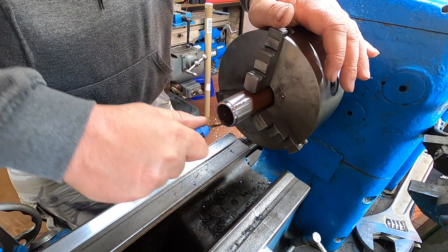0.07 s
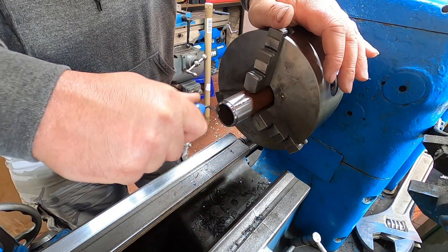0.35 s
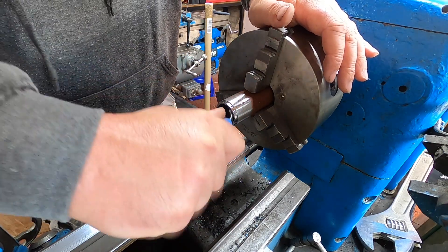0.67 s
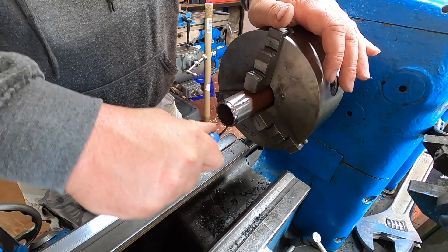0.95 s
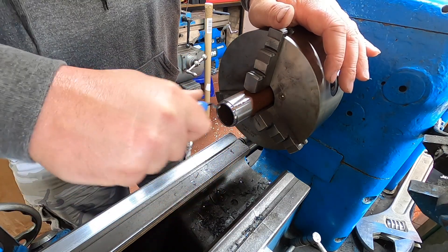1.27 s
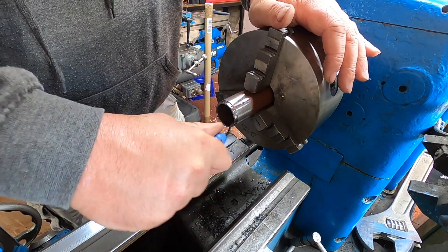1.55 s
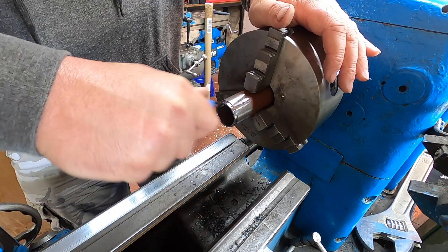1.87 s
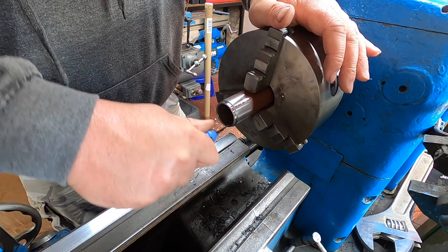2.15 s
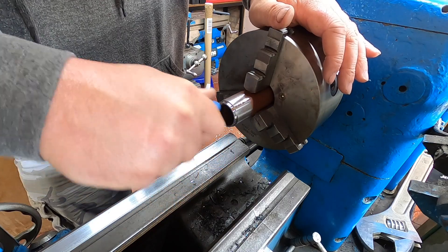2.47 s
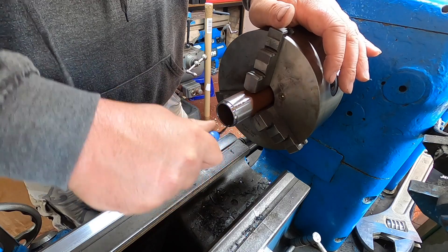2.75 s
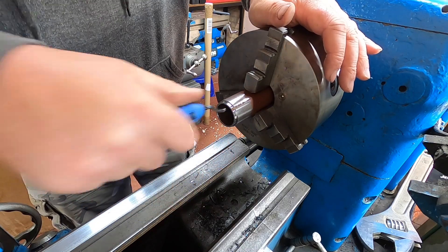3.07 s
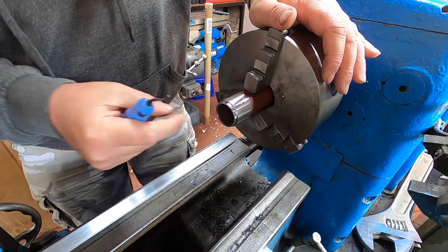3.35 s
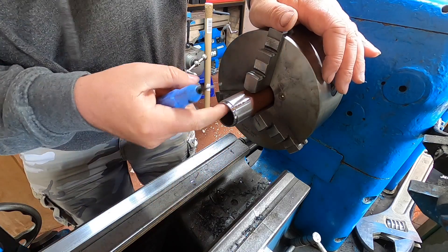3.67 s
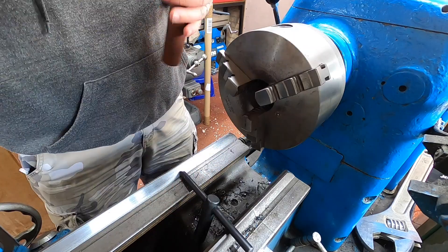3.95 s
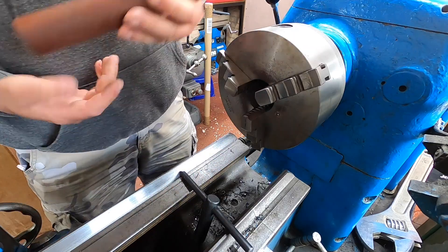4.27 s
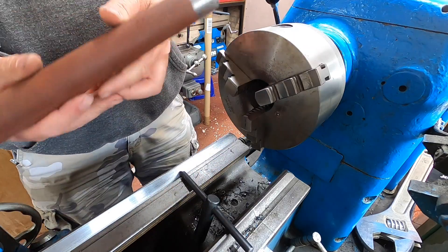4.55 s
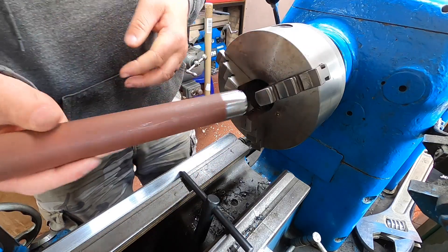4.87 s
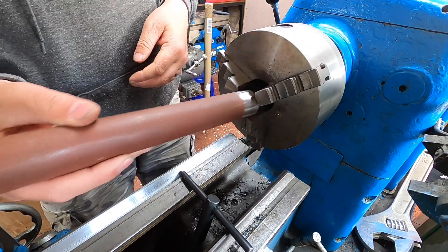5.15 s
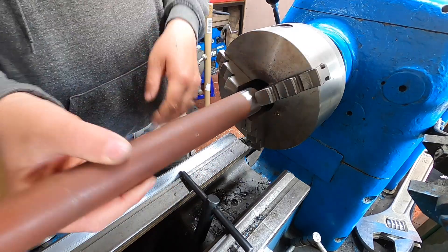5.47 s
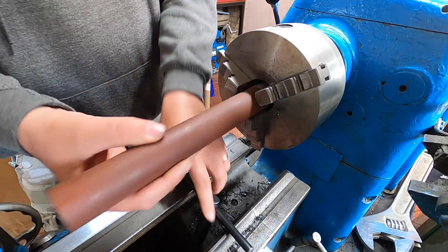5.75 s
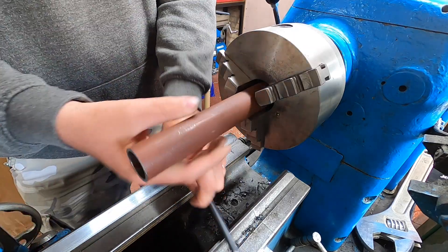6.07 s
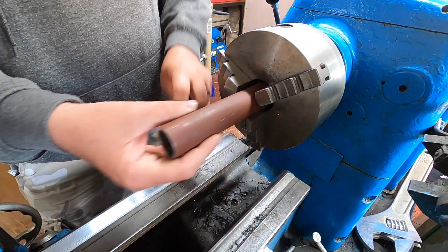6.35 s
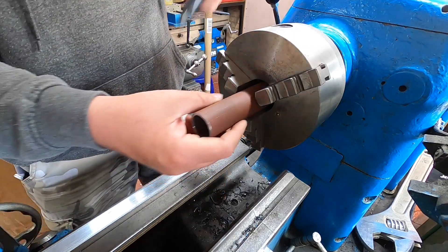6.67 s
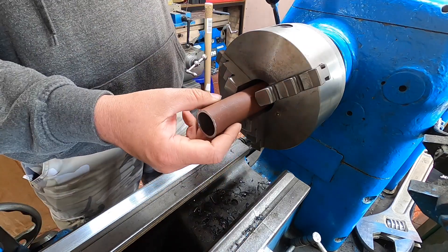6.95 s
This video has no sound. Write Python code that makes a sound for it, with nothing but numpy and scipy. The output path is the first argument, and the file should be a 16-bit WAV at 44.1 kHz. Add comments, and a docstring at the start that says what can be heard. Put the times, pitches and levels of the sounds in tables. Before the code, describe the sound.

Close, gritty scraping of a small blade on a steel tube starts lightly and builds, full of metallic snaps and short squeaks. The sound cuts out for a moment. Then a longer tube clinks and grinds into the jaws of a lathe chuck with quickly choked rings, followed by a quick cluster of clanks from a chuck key and a few light taps. A low rumble and faint cloth rustle fill the small workshop.

```python
"""Small workshop, at a lathe. A swivel-blade deburring tool is cranked round the mouth of a steel tube in the
chuck: stick-slip makes it rasp and squeak, and it snaps over burrs, skips and lands again. The sound drops out
and the scene changes: a longer tube is fed in. It knocks and slides on the jaws, ringing until the next contact
chokes it. The chuck key clanks as it is lifted off the bed. Sleeves swish over a low rumble."""
import sys
import numpy as np
from scipy import signal
from scipy.fft import rfft, irfft, next_fast_len
from scipy.io import wavfile
from scipy.ndimage import map_coordinates

SR = 44100
rng = np.random.default_rng(int(sys.argv[2]) if len(sys.argv) > 2 else 0)


def transcribe(signal):
    """Save signal, clipped to [-1, 1], as a 16-bit WAV file at the path in sys.argv[1]."""
    frames = np.atleast_2d(signal).T
    limited = np.clip(frames, -1, 1)
    pcm = np.round(limited * 32767).astype(np.int16)
    wavfile.write(sys.argv[1], SR, pcm)


N = 317961
TIME_S = np.arange(N) / SR

# All table levels are relative.
# Cutting effort. Each row: time in seconds, scrape level in dB.
SCRAPE_LEVEL = [(0.0, -54), (0.31, -55), (0.43, -47), (0.53, -38), (0.65, -42.5), (0.81, -50.5),
                (0.97, -53.5), (1.07, -49.5), (1.11, -44), (1.22, -40), (1.32, -38), (1.42, -32.5),
                (1.47, -39.5), (1.56, -43.5), (1.69, -43), (1.715, -30.5), (1.78, -34), (1.82, -30),
                (1.9, -36), (1.98, -27.5), (2.04, -30.5), (2.1, -44.5), (2.15, -26.5), (2.18, -36),
                (2.25, -37.5), (2.31, -28), (2.425, -37), (2.5, -30), (2.585, -31.5), (2.606, -35),
                (2.73, -36.5), (2.81, -33.5), (2.87, -36.5), (2.96, -37), (3.08, -36), (3.14, -59),
                (3.2, -70), (3.4, -84)]
# Blade resonance, sinking as it bites in. Each row: time in seconds, centre in Hz.
BITE_CURVE = [(0.3, 2830), (0.5, 2910), (0.66, 1874), (0.8, 2900), (1.25, 2580), (1.44, 2100), (1.53, 3730),
              (1.72, 2500), (1.82, 3100), (1.93, 2690), (2.03, 1574), (2.08, 3920), (2.17, 2974),
              (2.42, 2220), (2.53, 2400), (2.6, 1450), (2.69, 3610), (2.81, 2000), (2.95, 2560),
              (3.03, 2200), (3.1, 3420)]
# Blade squeaks. Each row: start in seconds, length in seconds, pitch in Hz, level in dB.
BLADE_SQUEAKS = [(0.341, 0.014, 2690, -31.5), (0.451, 0.027, 3140, -26), (1.246, 0.015, 2730, -23),
                 (1.864, 0.016, 2190, -23), (2.406, 0.0078, 2250, -22.5), (2.435, 0.006, 2280, -26.5),
                 (2.456, 0.014, 2200, -31), (2.477, 0.0049, 2270, -20.5), (2.528, 0.0024, 5170, -21),
                 (3.018, 0.015, 2270, -27.5), (3.065, 0.023, 3410, -30.5), (3.107, 0.0061, 3120, -23.5)]
# Burrs letting go. Each row: start in seconds, peak in dB, centre in Hz, treble tilt in dB per octave.
BURR_SNAPS = [(0.173, -30.5, 4050, 6), (0.331, -19, 3017, -0.5), (0.373, -21, 2860, 2),
              (0.4, -22.5, 2994, 4), (0.451, -17, 2400, -1), (0.456, -10, 3320, -4),
              (0.466, -15.5, 2300, 1.5), (0.478, -18, 3300, 3), (0.508, -11, 3730, -2),
              (0.605, -20, 2945, 0), (0.94, -25, 2410, 3), (1.013, -18, 2500, -2.5),
              (1.239, -9.5, 2450, -4), (1.254, -7, 2870, -6), (1.293, -16.5, 2240, -5),
              (1.335, -23, 2950, -10), (1.359, -11, 2300, 6.5), (1.373, -10.5, 2300, 0),
              (1.425, -13, 3000, -2.5), (1.575, -20, 2390, -7.5), (1.606, -14, 3080, -8.5),
              (1.702, -7.5, 1418, -2), (1.715, -13.5, 1160, 0.5), (1.725, -4.5, 1194, -9.5),
              (1.737, -8, 2326, 2.5), (1.756, -8.5, 1250, -1), (1.769, -20.5, 2400, 3),
              (1.813, -9.5, 2940, -6.5), (1.857, -14, 2140, 2), (1.873, -14, 2180, 3.5),
              (1.919, -9, 2158, 4), (1.965, -20.5, 2258, 1.5), (2.196, -9, 2300, -10.5),
              (2.207, -14, 1224, -0.5), (2.217, -6.5, 1740, -6.5), (2.298, -18.5, 1256, -16.5),
              (2.368, -13, 2234, 2.5), (2.376, -7, 2144, 3.5), (2.41, -17, 2195, 9.5),
              (2.4318, -18.5, 2147, 5.5), (2.457, -20, 2304, -2.5), (2.477, -19, 2220, 0.5),
              (2.49, -13.5, 4180, 2.5), (2.51, -17, 4600, -1), (2.526, -15.5, 5200, 0.5),
              (2.55, -14, 2830, 3.5), (2.584, -7.5, 1385, -2), (2.6111, -5.5, 1466, 2),
              (2.7, -8.5, 3730, 1.5), (2.776, -7.5, 2800, -4), (2.803, -17, 2000, -11),
              (2.808, -8.5, 1700, -13), (2.82, -14, 1500, -2), (2.856, -11, 3050, 3),
              (2.94, -14, 2880, -13), (2.957, -13, 2500, -20), (2.986, -10, 2130, 5.5),
              (3.015, -23, 2150, 10), (3.024, -16.5, 2220, 6.5), (3.077, -12, 3380, 8),
              (3.097, -13, 4030, 13), (3.108, -12, 3080, 14), (3.167, -24.5, 2060, 4),
              (3.225, -42, 3990, 13), (3.25, -45, 4500, 11)]
# Blade dropping back on the rim. Each row: landing in seconds, skip before it in seconds, crack in dB,
# crack centre in Hz, jolt in dB.
BLADE_LANDINGS = [(0.77, 0.12, -4.5, 3640, -20), (1.029, 0.0036, -13, 1940, -30),
                  (1.281, 0.0069, -8.5, 2490, -26), (1.517, 0.034, -4, 4300, -21),
                  (2.066, 0.034, -3.5, 3600, -25.5), (2.669, 0.049, -2.5, 3620, -25.5)]
# Tube on the jaws; the row at 6.257 s is the key nudging the tube. Each row: start in seconds, crack in dB,
# clonk in dB, lowest mode in dB, # overtones in dB, delay to seating in seconds, seating clonk in dB.
JAW_KNOCKS = [(4.884, -61, -73.5, -53, -51.5, 0.055, -65),
              (5.038, -17.5, -25.5, -17.5, -26.5, 0.018, -27.5),
              (5.173, -31, -34.5, -47, -34, 0.044, -30.5), (5.288, -27, -43, -30.5, -36, 0.014, -41),
              (5.313, -25.5, -31, -59, -25, 0.0038, -29.5), (5.449, -37, -51.5, -59, -52, 0.0031, -64),
              (5.56, -29.5, -45, -37, -50, 0.04, -49), (5.612, -22.5, -29, -32, -29.5, 0.018, -29.5),
              (5.694, -28, -30, -29, -40, 0.011, -27), (5.72, -13, -19.5, -21, -28, 0.0094, -23),
              (5.749, -12.5, -25.5, -23.5, -33.5, .005, -21), (5.925, -20, -38.5, -16, -22.5, 0.036, -27.5),
              (6.257, -25.5, -36.5, -37, -25, 0.015, -30.5), (6.478, -38, -47, -38, -30, 0.015, -38.5),
              (6.624, -30.5, -31.5, -47, -38, 0.012, -32), (7.02, -39, -50.5, -65, -40, 0.0036, -51.5)]
# Pushes along the jaws. Each row: start in seconds, hold in seconds, singing in dB, grinding in dB.
TUBE_PUSHES = [(4.76, 0.23, -74, -100), (5.037, 0.0063, -55.5, -55), (5.213, 0.08, -64, -37.5),
               (5.565, 0.16, -61.5, -65), (5.691, 0.03, -45, -37), (5.855, 0.11, -56.5, -42.5),
               (5.967, 0.2, -62.5, -37), (6.44, 0.095, -58, -38), (6.671, 0.15, -59, -41.5),
               (7.027, 0.037, -78.5, -46.5)]
# Key on the bed. Each row: start in seconds, impact in dB, clang in dB, clang tilt in dB per octave.
KEY_CLANKS = [(6.114, -42, -43.5, -4), (6.16, -36, -34.5, -7.5), (6.2573, -23.5, -45, -4),
              (6.274, -13, -25, 0), (6.283, -14.5, -33, -20), (6.301, -15.5, -31, -4),
              (6.354, -20.5, -30, -7), (6.364, -13.5, -30.5, 6)]
# Passing sleeves. Each row: peak time in seconds, length in seconds, level in dB.
SLEEVE_SWISHES = [(3.4, 0.49, -78), (3.82, 0.06, -59), (4.33, 0.22, -63.5), (4.597, 0.11, -64),
                  (4.798, 0.08, -66)]
# Rumble, one curve per job. Each row: time in seconds, level in dB.
RUMBLE_LEVELS = [
    [(0.1, -45), (2.73, -44), (3.11, -46), (3.8, -48)],
    [(4.16, -42.5), (4.53, -42), (4.64, -49.5), (7.2, -39.5)],
]

# Struck modes. Each row: frequency in Hz, level in dB, T60 in seconds.
TUBE_MODES = [(2768, 1.5, 1), (6680, -23.5, 0.46), (8000, -24.5, 0.25), (8350, -18, 0.17),
              (9040, -29, 0.23), (10230, -33, 0.19), (11230, -46, .15), (11850, -42, 0.2),
              (13730, -46.5, .2), (14530, -46, .2)]
KEY_MODES = [(1202, -6.5, 0.17), (1340, -5, 0.29), (1410, -2, 0.28), (1506, 1, 0.12), (1566, -8, 0.19),
             (1940, -4.5, 0.13), (2440, -8.5, 0.16), (2580, -17, 0.3), (2724, -13, 0.13), (3370, -11, 0.17),
             (4000, -6, 0.11), (5356, -19, .14), (5760, -6.5, 0.087), (8700, -24.5, 0.1), (9500, -21, 0.17),
             (10600, -37, 0.12)]
LATHE_MODES = [(134.9, -8.5, 0.57), (163.3, -0.5, 0.27), (206, 1.5, 0.14), (290, -5.5, 0.15),
               (356, -7, 0.24), (382.5, -3, 0.22), (493, -3, 0.19), (463.6, 0.5, 0.15), (565, -9, 0.18),
               (624, -7, 0.16), (812, -8, 0.166), (952, 1.5, 0.052), (1055, -16, 0.2), (1167, -10.5, 0.24)]
BUMP_MODES = [(520, -7, .03), (845, 0, .03)]
# Driven resonances. Each row: centre in Hz, width in Hz, level in dB.
RIM_MODES = [(160, 19, 11), (1156, 62, -6), (2200, 45, -5), (2834, 25, -6), (3130, 30, -9), (3960, 40, -4),
             (4634, 50, -8), (5355, 50, -8.5), (8240, 150, -9)]  # short tube in the chuck
RUBBED_MODES = [(2764, 106, 11.5), (3870, 330, -5), (6680, 78, -5.5), (8000, 120, -4.5), (7900, 1300, -11),
                (8240, 29, 0), (8840, 160, -4.5), (10150, 75, -15.5), (11370, 120, -21.5),
                (12220, 200, -21.5), (12460, 94, -29.5), (13930, 80, -29)]  # long tube

# Noise spectra. Each row: frequency in Hz, density in dB.
BLADE_SPECTRUM = [(260, -25), (450, -11.5), (625, -15.5), (794, -6.5), (1040, -7.5), (1190, -3.5),
                  (1320, -5), (1950, -8), (2190, -6), (3700, -7.5), (4700, -4), (5600, -15.5), (6730, -19),
                  (8670, -14.5), (10500, -33.5), (16000, -49)]
DRONE_SPECTRUM = [(55, -18.5), (85, 5.5), (115, -8), (140, -8.5), (163, -1), (188, -6.5), (220, -2),
                  (265, -14.5), (330, -3.5), (470, -7.5), (700, -19), (1500, -41)]
JOLT_SPECTRUM = [(30, -25.5), (60, -14.5), (85, 14), (150, -13.5), (220, -8.5), (450, -12.5), (900, -59.5)]
JAW_CRACK_SPECTRUM = [(200, -28), (600, -6.5), (950, 9), (2000, 5), (3000, 13.5), (4200, -4.5), (7000, -15),
                      (10000, -29.5), (15000, -47.5)]
CLONK_SPECTRUM = [(70, -12.5), (140, -14.5), (210, -11.5), (260, -12.5), (370, -3.5), (460, -0.5),
                  (660, -8.5), (950, -3.5), (1500, -10.5), (2200, -13), (3000, -31), (4500, -41),
                  (8000, -69), (15000, -72)]
GRIND_SPECTRUM = [(70, -7.5), (145, 4.5), (250, 0.5), (370, 7), (410, 0.5), (455, 9.5), (650, -10.5),
                  (1500, -20), (3000, -20.5), (5500, -47.5), (10000, -53)]
KEY_CRACK_SPECTRUM = [(180, -44), (300, -32.5), (447, -23), (946, -20.5), (1510, -3), (2210, -12),
                      (2700, 6), (2880, -5), (4440, -14.5), (5700, -15), (7570, -26.5), (9710, -34),
                      (16000, -65)]
BED_SPECTRUM = [(100, -18), (300, -16), (450, -9.5), (800, -21), (1400, -10), (2000, -21), (2600, -13),
                (3500, -20), (5500, -38), (8000, -34), (15000, -75)]
CLOTH_SPECTRUM = [(180, -24.5), (300, -2.5), (392, -11.5), (749, -12), (900, -9), (1480, -7.5), (2840, -11),
                  (3700, -13), (5200, -13), (8360, -15.5), (16000, -52.5)]
RUMBLE_SPECTRUM = [(8.8, -30.5), (15, 3.5), (53, -6.5), (88, -13.5), (117, -28), (150, -22.5), (184, -35),
                   (216, -29), (318, -47), (700, -58.5), (910, -79.5), (1540, -120)]
# Stereo image. Each row: frequency in Hz, left-right correlation.
CORRELATION = [(60, .988), (200, .996), (700, .99), (1500, .975), (3100, .95), (6500, .84), (10000, .68),
               (15000, .4)]


def scraping():
    """The blade rasps as it peels a chip; its resonance sinks as it bites. The lathe drones under it."""
    scrape_db, bite_hz = curve(SCRAPE_LEVEL), curve(BITE_CURVE)
    full_cut_db, skip_db = -31, -22
    drone_db = -40 + 0.65 * (scrape_db - full_cut_db)
    for land_s, skip_s, *_ in BLADE_LANDINGS:
        corners_s = [land_s - skip_s, land_s - skip_s / 2, land_s, land_s + 0.032]
        scrape_db += np.interp(TIME_S, corners_s, [0, skip_db, skip_db, 0])
    rasp = stick_slip(rate_hz=860, spread_db=3.8, t60_s=0.012) + from_db(-17) * noise(BLADE_SPECTRUM)
    rasp += from_db(3.5) * gliding_resonance(rasp, bite_hz, width_hz=550)
    rasp *= from_db(2.2 * wobble(step_s=0.008))  # uneven grip
    working = np.interp(TIME_S, [3.3, 3.45], [1, 0])
    return working * (from_db(scrape_db - 1) * rasp + from_db(drone_db) * noise(DRONE_SPECTRUM))


def stick_slip(rate_hz, spread_db, t60_s, bands=10):
    """Clumps of uneven clicks, each clump ringing another resonance of the blade."""
    out, cut_samples = np.zeros((2, N)), int(SCRAPE_LEVEL[-1][0] * SR)
    for hz in np.geomspace(1200, 5200, bands):
        strengths = from_db(spread_db * np.clip(rng.standard_normal(cut_samples), -2, 1.5))
        clumps = from_db(6 * np.minimum(wobble(step_s=0.018)[:cut_samples], 1))
        clicks = strengths * clumps * (rng.random(cut_samples) < rate_hz / bands / SR)
        slip = burst(BLADE_SPECTRUM, t60_s, rise_s=0.0001, samples=2048)
        slip += from_db(8) * signal.lfilter(*resonator(hz, width_hz=220), slip)
        add(out, 0, signal.oaconvolve(clicks[None], slip, axes=1))
    return out / np.std(out[:, :cut_samples])


def squeaking():
    """The slips briefly lock onto one blade mode, which rings on after them."""
    out, t = np.zeros((2, N)), TIME_S[:SR // 4]
    for start_s, length_s, hz, db in BLADE_SQUEAKS:
        drive = np.sin(np.pi * np.minimum(t / length_s, 1)) * noise(BLADE_SPECTRUM, len(t))
        tone = signal.lfilter(*resonator(hz, width_hz=240), drive)
        add(out, start_s, from_db(db) * tone / np.std(tone[:, :int(length_s * SR)]))
    return out


def snap(centre_hz, treble_db_per_octave):
    """Hard crack and brief blade buzz, peak 1. A sharper release has more treble."""
    hz = np.geomspace(200, 16000, 60)
    emphasis_db = 7 * np.exp(-np.log2(hz / centre_hz) ** 2)
    tilt_db = treble_db_per_octave * np.clip(np.log2(hz / 3000), 0, 1.5)
    spectrum = np.transpose([hz, at_hz(BLADE_SPECTRUM, hz) + emphasis_db + tilt_db])
    crack = burst(spectrum, t60_s=0.0046, rise_s=0.0001, samples=4096)
    buzz = from_db(-2) * burst(spectrum, t60_s=0.031, rise_s=0.0011, samples=4096)
    return (crack + buzz) / np.abs(crack + buzz).max()


def snapping():
    """The blade catches burrs and slips off them one by one."""
    out = np.zeros((2, N))
    for start_s, db, centre_hz, treble_db_per_octave in BURR_SNAPS:
        add(out, start_s, from_db(db - 5.5) * snap(centre_hz, treble_db_per_octave))
    return out


def landing():
    """After a skip the blade grazes the rim, slams onto it and jolts the lathe."""
    out, graze_lead_s = np.zeros((2, N)), 0.0045
    for land_s, _, crack_db, centre_hz, jolt_db in BLADE_LANDINGS:
        graze = from_db(crack_db - 9.5) * snap(centre_hz, treble_db_per_octave=2.5)
        slam = from_db(crack_db - 3) * snap(centre_hz, treble_db_per_octave=2.5)
        add(out, land_s - graze_lead_s, graze)
        add(out, land_s, slam)
        add(out, land_s, from_db(jolt_db - 6) * burst(JOLT_SPECTRUM, t60_s=0.43, rise_s=0.0039))
    return out


def tool_bump(start_s):
    """One dull knock of the tool against the tube."""
    out = np.zeros((2, N))
    add(out, start_s, from_db(-22) * struck(BUMP_MODES, scatter_db=0, rise_s=0.0005))
    return out


def rim_ring(blade):
    """The clamped tube and the lathe resonate, driven by the blade."""
    return sum(from_db(db) * signal.lfilter(*resonator(hz, width_hz), blade)
               for hz, width_hz, db in RIM_MODES)


def knocking():
    """The tube strikes one jaw, or is nudged by the key, and rings until it seats on another, which chokes its
    lowest mode most."""
    out, t = np.zeros((2, N)), TIME_S[:SR // 2]
    choke_db_per_s, lowest_floor_db, overtone_floor_db = 3000, -40, -24
    seat_samples, seat_decay_s = SR // 10, 0.012
    seat_fade = np.exp(-t[:seat_samples] / seat_decay_s)
    for start_s, crack_db, clonk_db, lowest_db, overtones_db, free_s, seat_db in JAW_KNOCKS:
        choke_db = -choke_db_per_s * np.maximum(t - free_s, 0)
        lowest = struck(TUBE_MODES[:1], scatter_db=0.5)
        lowest *= from_db(lowest_db + np.maximum(choke_db, lowest_floor_db))
        overtones = struck(TUBE_MODES[1:], scatter_db=2, rise_s=0.0005)
        overtones *= from_db(overtones_db + np.maximum(choke_db, overtone_floor_db))
        add(out, start_s, from_db(4) * (lowest + overtones) + jaw_contact(crack_db, clonk_db))
        add(out, start_s + free_s, jaw_contact(seat_db + 3.5, seat_db))
        seat_ring = seat_fade * struck(TUBE_MODES, scatter_db=5, samples=seat_samples)
        add(out, start_s + free_s, from_db(seat_db - 5) * seat_ring)
    return out


def jaw_contact(crack_db, clonk_db):
    """Steel cracks against a jaw, duller when soft. Chuck and bed answer with a hollow clonk."""
    hard_knock_db, lowest_hz = -18, TUBE_MODES[0][0]
    tilt_db_per_octave = crack_db - hard_knock_db
    spectrum = [(hz, db + tilt_db_per_octave * np.clip(np.log2(hz / lowest_hz), 0, 1.5))
                for hz, db in JAW_CRACK_SPECTRUM]
    crack = burst(spectrum, t60_s=0.047, rise_s=0.00015)
    thud = burst(CLONK_SPECTRUM, t60_s=0.24, rise_s=0.002)
    ring = struck(LATHE_MODES, scatter_db=2.5, rise_s=0.0008)
    return from_db(crack_db - 3.5) * crack + from_db(clonk_db - 5.5) * (thud + ring)


def sliding():
    """Pushes along the jaws, with light rubbing between, make the tube sing and the lathe grind."""
    attack_s, release_s, on_jaws_s = 0.041, 0.028, 5.03
    singing_gain = from_db(-86.5) * np.interp(TIME_S, [4.5, 4.8], [0, 1])
    grinding_gain = from_db(-60) * (TIME_S > on_jaws_s)
    for start_s, hold_s, singing_db, grinding_db in TUBE_PUSHES:
        swell = np.clip((TIME_S - start_s) / attack_s + 1, 0, 1) ** 2
        push = swell * np.exp(-np.maximum(TIME_S - start_s - hold_s, 0) / release_s)
        singing_gain += from_db(singing_db) * push
        grinding_gain += from_db(grinding_db) * push
    return tube_song(singing_gain) + grinding_gain * noise(GRIND_SPECTRUM)


def tube_song(gain):
    """Friction drives the tube's modes. Shifting contact detunes the low ones and breaks them up."""
    firm_db, low_below_hz, detune_share = -61, 5000, 0.011
    firmness = np.minimum(gain / from_db(firm_db) + 1e-9, 1) ** 0.82  # low modes fade first
    chatter = from_db(3.5 * wobble(step_s=0.009))
    warped_s = TIME_S + np.cumsum(detune_share * wobble(step_s=0.018)) / SR
    friction, song = noise([(1000, 0), (16000, 0)]), 0
    for hz, width_hz, db in RUBBED_MODES:
        tone = from_db(db) * rubbed(friction, hz, width_hz)
        if hz < low_below_hz:
            detuned = np.array([np.interp(warped_s, TIME_S, channel) for channel in tone])
            song += firmness * chatter * detuned
        else:
            song += from_db(4.5 * wobble(step_s=0.028)) * tone
    return gain * song


def chuck_key():
    """The steel key bumps along the bed: a crack and a short clang, brighter where an edge hits."""
    out, lowest_hz = np.zeros((2, N)), KEY_MODES[0][0]
    for start_s, impact_db, clang_db, db_per_octave in KEY_CLANKS:
        crack = from_db(-6) * burst(KEY_CRACK_SPECTRUM, t60_s=0.11, rise_s=0.00032)
        bed = from_db(-14) * burst(BED_SPECTRUM, t60_s=0.39, rise_s=0.0034)
        modes = [(hz, db + db_per_octave * np.log2(hz / lowest_hz), t60_s) for hz, db, t60_s in KEY_MODES]
        clang = struck(modes, scatter_db=2, rise_s=0.0004)
        add(out, start_s, from_db(impact_db) * (crack + bed) + from_db(clang_db) * clang)
    return out


def handling():
    """Fingers slide on the tube on its way to the chuck; one bright overtone sings faintly."""
    hz, width_hz, _ = RUBBED_MODES[5]
    touch = np.interp(TIME_S, [4.45, 4.551, 4.9, 5.0], [0, 1, 1, 0])
    return from_db(-70.5) * touch * rubbed(noise(CLOTH_SPECTRUM), hz, width_hz)


def room_tail(x, t60_s):
    """Short, diffuse reverberation of the cluttered workshop."""
    spectrum = [(100, 4), (1000, -1), (4000, -1.5), (9000, 0), (15000, -2.5)]
    tail = burst(spectrum, t60_s, rise_s=0.0027)
    tail /= np.sqrt(np.sum(tail ** 2) / 2)
    return signal.oaconvolve(x.mean(axis=0)[None], tail, axes=1)[:, :N]


def sleeves():
    """Cloth brushes past in soft swishes over a faint rustle."""
    swishes = sum(from_db(db - 3) * np.exp(-(2 * (TIME_S - peak_s) / length_s) ** 2)
                  for peak_s, length_s, db in SLEEVE_SWISHES)
    return (from_db(-76) + swishes) * noise(CLOTH_SPECTRUM)


def rumble():
    """Low noise, drifting in level."""
    return from_db(curve(np.vstack(RUMBLE_LEVELS)) + 4.5) * noise(RUMBLE_SPECTRUM)


def from_db(db):
    """Decibels to gain."""
    return 10 ** (np.asarray(db) / 20)


def unit_rms(x):
    """Scale to rms 1."""
    return x / np.sqrt(np.mean(x ** 2) + 1e-20)


def curve(rows):
    """A time curve at every sample."""
    return np.interp(TIME_S, *np.transpose(rows))


def at_hz(rows, hz):
    """Interpolate on a log-frequency axis."""
    known_hz, values = np.transpose(rows)
    return np.interp(np.log(hz + 1), np.log(known_hz), values)


def wobble(step_s):
    """Gaussian values joined by straight lines."""
    knots_s = np.arange(0, N / SR, step_s)
    return np.interp(TIME_S, knots_s, rng.standard_normal(len(knots_s)))


def add(out, start_s, sound):
    """Mix in a stereo sound."""
    start = round(start_s * SR)
    out[:, start:start + sound.shape[1]] += sound[:, :N - start]


def noise(spectrum, samples=N):
    """Coloured stereo noise, less correlated in the treble; rms 1."""
    padded = next_fast_len(samples)
    hz = np.arange(padded // 2 + 1) * SR / padded
    correlation = at_hz(CORRELATION, hz)
    mid, side = rfft(rng.standard_normal((2, padded)))
    pair = np.sqrt(1 + correlation) * mid + np.sqrt(1 - correlation) * side * [[1], [-1]]
    return unit_rms(irfft(pair * from_db(at_hz(spectrum, hz)), padded)[:, :samples])


def burst(spectrum, t60_s, rise_s, samples=SR // 2):
    """Dense modes struck together: noise that swells and dies."""
    t = TIME_S[:samples]
    return noise(spectrum, samples) * np.exp(-np.log(1000) * t / t60_s) * (1 - np.exp(-t / rise_s))


def struck(modes, scatter_db, samples=SR // 2, rise_s=0.00011):
    """Decaying modes, weighted anew per blow. High ones reach the two ears out of phase."""
    hz, db, t60_s = np.transpose(modes)[:, :, None]
    t = TIME_S[:samples]
    gain = from_db(db + scatter_db * rng.standard_normal(hz.shape)) * rng.choice([-1, 1], hz.shape)
    envelope = gain * np.exp(-np.log(1000) * t / t60_s) * (1 - np.exp(-t / rise_s)) ** 2
    skew_rad = np.arccos(at_hz(CORRELATION, hz)) / 2 * rng.choice([-1, 1], hz.shape)
    phase_rad = 2 * np.pi * hz * t
    return np.array([(envelope * np.sin(phase_rad + ear * skew_rad)).sum(axis=0) for ear in (1, -1)])


def resonator(hz, width_hz):
    """Two-pole band-pass coefficients, peak gain 1."""
    r = np.exp(-np.pi * width_hz / SR)
    return np.array([1, 0, -1]) * (1 - r * r) / 2, [1, -2 * r * np.cos(2 * np.pi * hz / SR), r * r]


def rubbed(friction, hz, width_hz):
    """One mode sung by friction noise; rms 1."""
    mode = resonator(hz, width_hz)
    return unit_rms(signal.lfilter(*mode, signal.lfilter(*mode, friction)))


def gliding_resonance(x, hz, width_hz, block_samples=256):
    """A resonance whose centre moves block by block."""
    out, state = np.zeros_like(x), np.zeros((2, 2))
    for i in range(0, N, block_samples):
        block = slice(i, i + block_samples)
        out[:, block], state = signal.lfilter(*resonator(hz[i], width_hz), x[:, block], zi=state)
    return out


def from_the_right(x, lag_samples):
    """The left channel is late, slightly boosted and duller at the top."""
    late = map_coordinates(x[0], [np.arange(N) - lag_samples], order=1)
    return np.array([from_db(0.85) * late, x[1]])


def scene():
    """Deburring, then chucking the next tube, in one room."""
    blade = scraping() + squeaking() + snapping() + landing() + tool_bump(start_s=1.029)
    deburring = from_the_right(blade + rim_ring(blade), lag_samples=1.48)
    chucking = handling() + knocking() + sliding() + chuck_key()
    direct = from_db(-1) * deburring + chucking
    return direct + from_db(-11) * room_tail(direct, t60_s=0.24) + rumble() + sleeves()


def record(dry):
    """The sound drops out as the scene changes between the two jobs; lowest bass and top treble cut."""
    stop_s, fade_out_s, resume_s, fade_in_s = 3.845, 0.0054, 4.075, 0.022
    low_hz, high_hz = 32, 16700
    gate = np.clip(np.maximum((stop_s - TIME_S) / fade_out_s, (TIME_S - resume_s) / fade_in_s), 0, 1)
    highpass = signal.butter(4, low_hz, "high", fs=SR, output="sos")
    lowpass = signal.cheby2(14, 70, high_hz, fs=SR, output="sos")
    return signal.sosfilt(lowpass, gate * signal.sosfilt(highpass, dry) + 1e-18)


dry = scene()
out = record(dry)
transcribe(out)
```